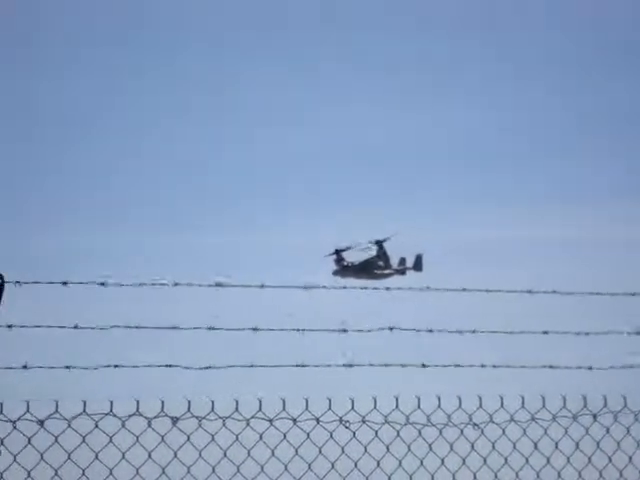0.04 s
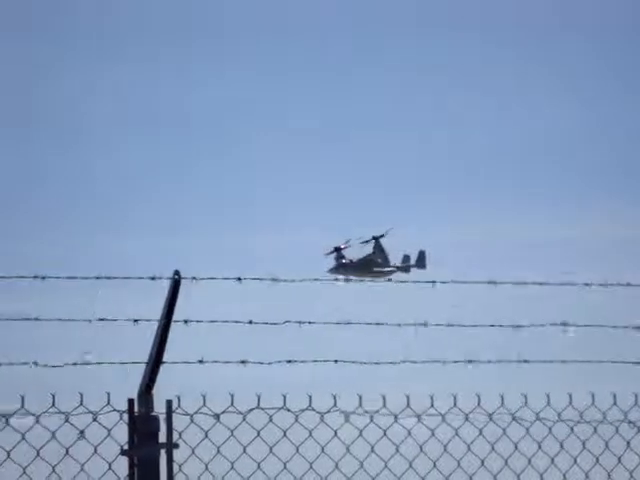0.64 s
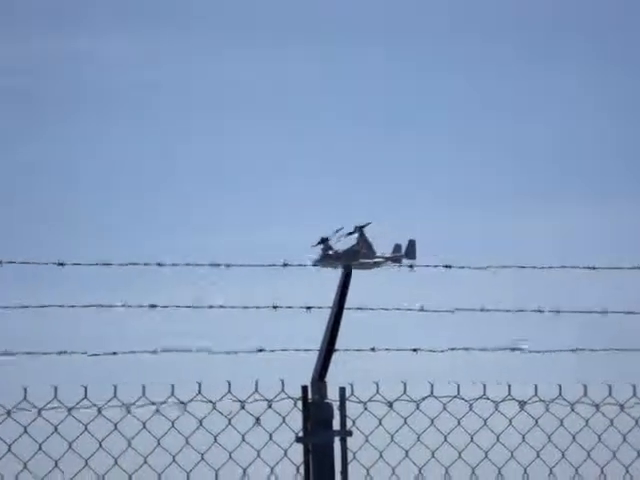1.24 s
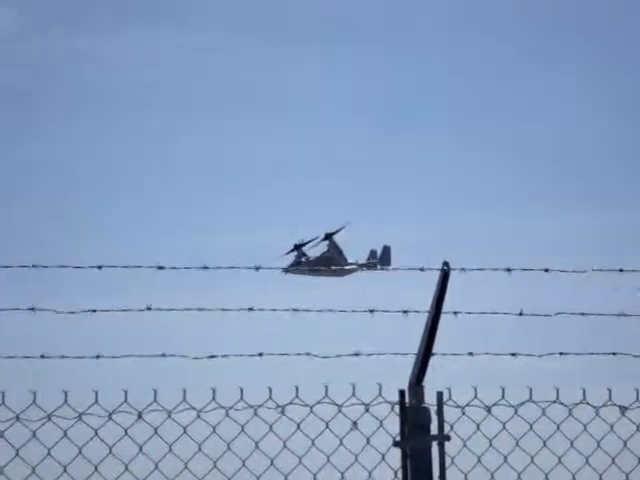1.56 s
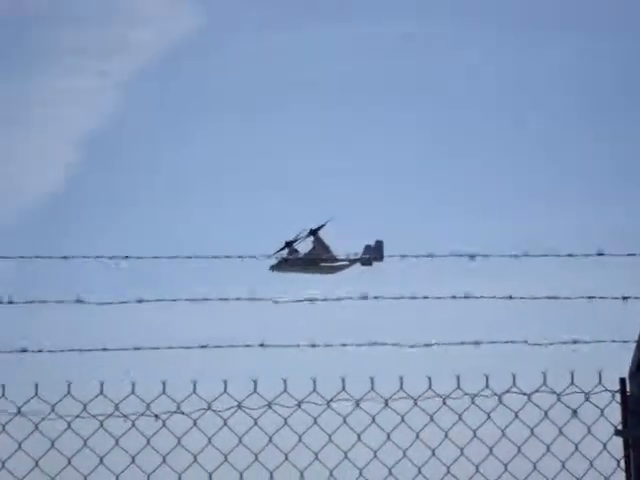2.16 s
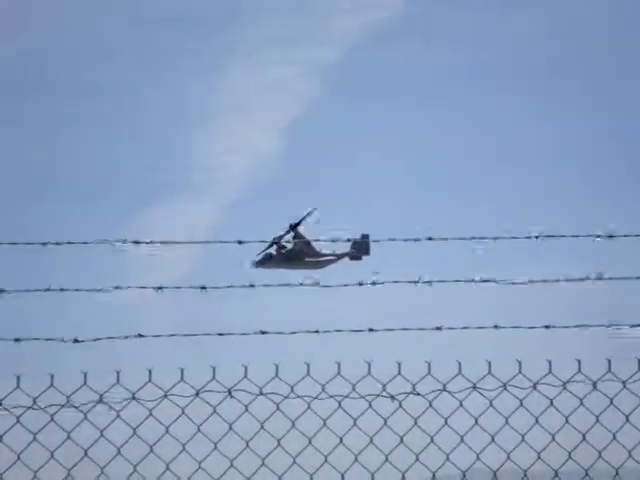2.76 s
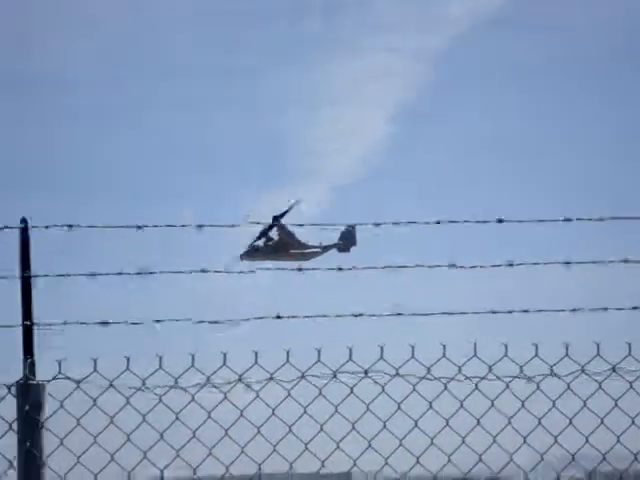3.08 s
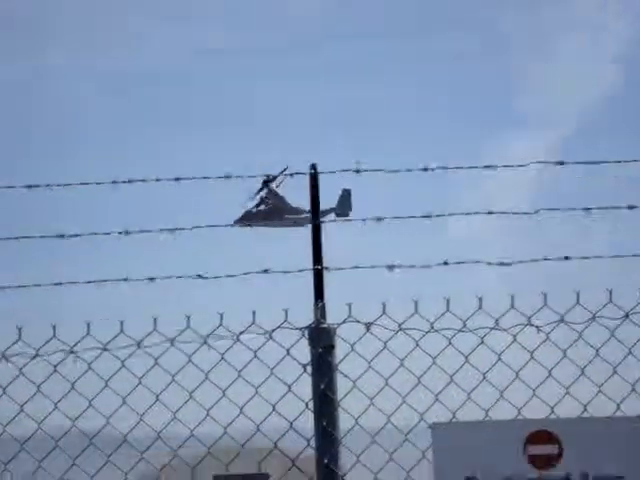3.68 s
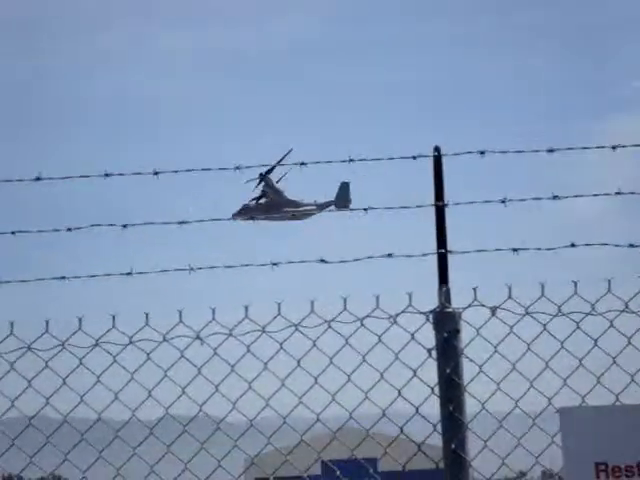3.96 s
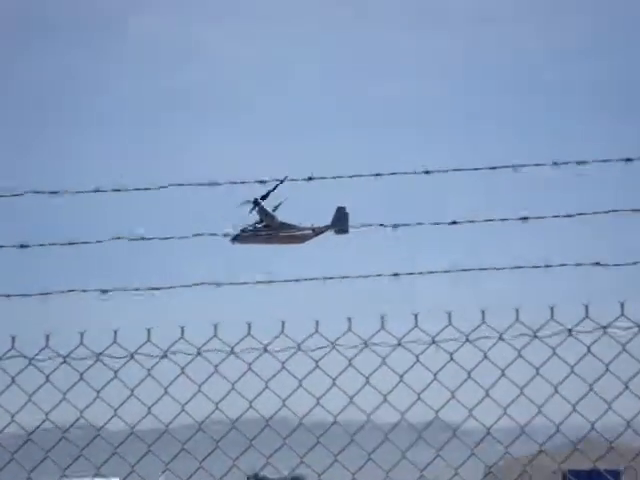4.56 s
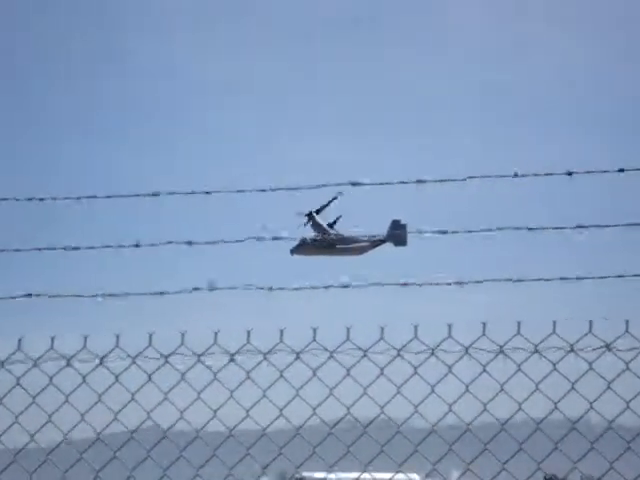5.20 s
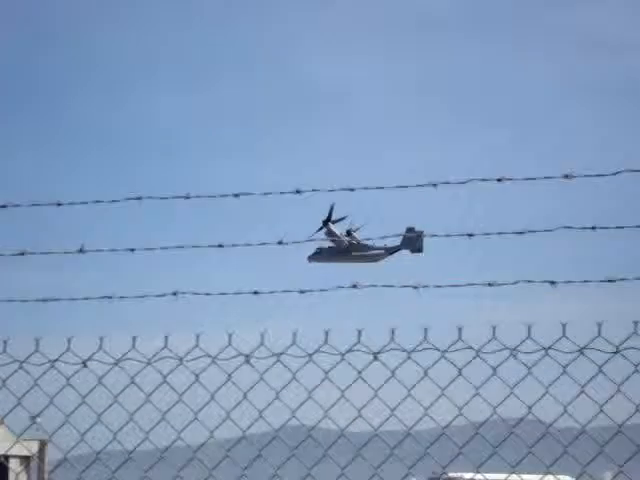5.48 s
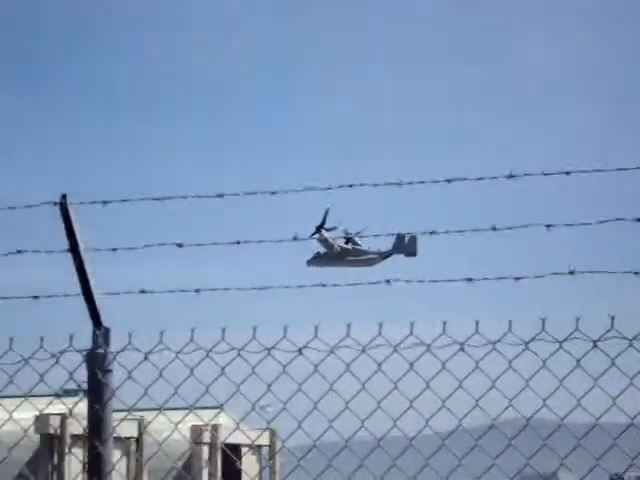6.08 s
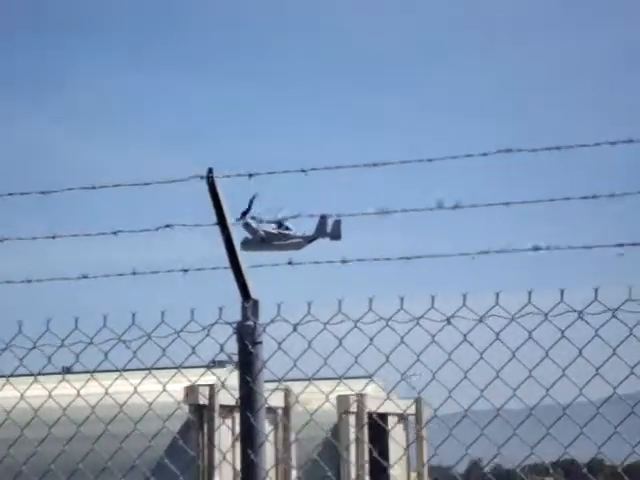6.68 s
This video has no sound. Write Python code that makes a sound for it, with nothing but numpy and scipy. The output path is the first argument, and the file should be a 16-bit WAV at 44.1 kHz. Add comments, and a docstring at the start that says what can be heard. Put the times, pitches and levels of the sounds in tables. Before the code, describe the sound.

A loud, continuous roar of rotors and hissing exhaust comes from a low tiltrotor passing outdoors, picked up by a small microphone at an airfield. Fast, even blade thuds mark the approach, with a thin turbine whine poking through now and then. Just past halfway the thudding drops away, a few sharp cracks and a tiny faint squeak sound, and the rushing noise swells unevenly as the aircraft leaves.

```python
"""A tiltrotor flies low past an airfield fence, heard through a small camera microphone.
On the approach each blade sends a pressure thump, from the near rotor and, later and weaker, the far one,
over a roar of blade turbulence and exhaust hiss; a turbine whine flares through four times.
Near 4 s the aircraft draws level and the thumps fade. A few sharp blade slaps and one faint chirp follow,
and the roar keeps surging as it draws away."""
import sys
import numpy as np
from scipy import signal
from scipy.fft import rfft, irfft
from scipy.io import wavfile
from scipy.ndimage import uniform_filter1d, map_coordinates

SR = 44100
rng = np.random.default_rng(int(sys.argv[2]) if len(sys.argv) > 2 else 0)


def materialize(psi):
    """Save the field psi as 16-bit PCM at rate SR to the path in sys.argv[1].

    A 1-D psi becomes a single channel; in a 2-D psi each row is a channel.
    """
    bounded = np.clip(np.atleast_2d(psi).T, -1, 1)
    quanta = np.round(bounded * 32767).astype(np.int16)
    wavfile.write(sys.argv[1], SR, quanta)


N = 301644
TIME = np.arange(N) / SR


# Thump fader, strong ahead of the rotors and weak behind them: time_s, level_db
THUMP_FADER = [(0, -27.5), (.3, -26), (.48, -23), (.71, -27.5), (1.07, -26), (1.21, -29), (1.62, -27),
               (2.2, -32.5), (2.6, -28.5), (2.94, -33), (3.46, -30.5), (3.7, -31), (3.92, -44), (4.3, -39),
               (5.4, -42), (5.7, -48), (6.84, -51.5)]
# The changing view of the two rotors: time_s, thump_half_width_ms, far_lag_ms, far_level_db
ROTOR_VIEW = [(0, 1.6, 22, -3), (.55, 1.35, 23.8, -7), (1.1, 1.56, 30, -6), (1.55, 1.7, 33.2, -5),
              (2.2, 2, 36, -1), (2.65, 1.6, 41.6, -10), (3.4, 2.12, 48, -30), (4.9, 1.94, 42, -18),
              (6.84, 4.2, 43, -2)]

def thumps(blades, trim_db=-1.0, uneven_db=-1.0, jitter_ms=0.14, mic_low_cut_hz=92):
    """Both rotors turn in step, but the far one's pressure pulses have a longer way to go."""
    half_width_ms, far_lag_ms, far_db = automation(ROTOR_VIEW)
    period_ms = 1000 / automation(BLADE_TEMPO)[0]
    pulses = 0
    for lag_ms, rotor_db in ((0, 0), (far_lag_ms, far_db)):
        from_blade_ms = ((blades - lag_ms / period_ms + .5) % 1 - .5) * period_ms
        u = (from_blade_ms + jitter_ms * drift(15)) / half_width_ms
        pulse = (u ** 2 - 1) * np.exp(-u ** 2 / 2)  # a pressure dip between two crests
        pulses = pulses + pulse * from_db(rotor_db + uneven_db * drift(10))
    # the microphone's bass roll-off makes each dip rebound into a taller crest
    pulses = low_cut(pulses, mic_low_cut_hz)
    return even_level(pulses, window_s=.094) * from_db(automation(THUMP_FADER)[0] + trim_db)


# The rotor's beat, slowing with the Doppler shift: time_s, blade_rate_hz
BLADE_TEMPO = [(0, 22.18), (1, 21.85), (2, 21.47), (3, 21.035), (4, 20.55), (5, 20.01), (6, 19.42),
               (7, 18.78)]

def blade_count(first_thump_s=.0251):
    """Number of blades gone by; whole at each thump of the near rotor."""
    count = np.cumsum(automation(BLADE_TEMPO)[0]) / SR
    return count - np.interp(first_thump_s, TIME, count)


# Sharp accents just after the aircraft draws level: time_s, peak_db, half_width_ms
SLAP_HITS = [(4.8316, -3.5, 0.23), (4.877, -8.5, 0.26), (5.459, -12, 0.31), (5.484, -24, 0.72)]

def slaps():
    """A blade that cuts a tip vortex gives a sharp swing from suction to overpressure."""
    out = 0
    for time_s, peak_db, half_width_ms in SLAP_HITS:
        u = (TIME - time_s) * 1000 / half_width_ms
        out = out + from_db(peak_db) * u * np.exp((1 - u ** 2) / 2)
    return out


# Faders of the noise bed, before surges and trims: time_s, wake_db, roar_db, hiss_db, sizzle_db
BED_FADERS = [(0, -39.5, -23.5, -26.5, -42), (1.1, -38, -25, -28, -42), (2.3, -38.5, -25.5, -27.5, -39.5),
              (3.1, -35, -23, -27, -37), (3.7, -36, -23.5, -25.5, -36.5), (4.4, -35.5, -24.5, -27, -39.5),
              (5.15, -36, -22, -25, -37.5), (5.9, -40, -23, -29, -41.5), (6.84, -36, -26, -29.5, -43)]

def turbulence(blades):
    """Four layers of rushing air that surge together; all but the wake also share a fast flutter."""
    flutter = drift(48)
    wake_db, roar_db, hiss_db, sizzle_db = automation(BED_FADERS)
    low_surge_db, high_surge_db = surges()
    return (wake(blades, wake_db + .23 * low_surge_db)
            + roar(blades, flutter, roar_db + low_surge_db)
            + hiss(blades, flutter, hiss_db + high_surge_db)
            + sizzle(blades, flutter, sizzle_db + .63 * high_surge_db))


# Swells in the noise bed: peak_s, length_s, roar_rise_db, hiss_rise_db
SURGE_CUES = [(.02, 0.068, 2, .5), (0.643, 0.092, 2, 2.5), (1.365, 0.13, 5, 1.8), (1.667, 0.2, 4, 4),
              (1.793, 0.068, 5, 4), (1.953, 0.11, 6, 2.5), (2.127, 0.13, 5.5, 3), (2.536, .14, 3.2, 4),
              (2.875, 0.11, 2.5, 4.5), (3.044, .07, 3, 4), (3.17, 0.055, 2.5, 1.5), (3.74, 0.15, 3, 2.5),
              (3.887, 0.12, 4.7, 5.8), (4.024, 0.041, 3.5, 0), (4.235, 0.031, 6.5, 2.2),
              (4.391, 0.065, 6, 2), (4.523, 0.054, 1.5, 3), (4.73, 0.11, 2.5, 1.5), (4.83, 0.12, 2.5, 2),
              (5.04, 0.056, 3, 1), (5.212, 0.11, 4, 2.5), (5.494, 0.11, 6.5, 4.5), (5.586, 0.066, 1, 3.5),
              (5.762, 0.072, 6, 6.5), (5.904, .05, 3.5, 2), (6.033, 0.093, 7, 10), (6.3, 0.17, 3.5, 6),
              (6.46, 0.069, 7, 6.5), (6.662, 0.079, 7, 6), (6.797, 0.1, 9.5, 6.5)]

def surges(unrest_db=0.33):
    """Restless air lifts the roar and the hiss, in dB: strong surges over small chance ones."""
    roar_db = hiss_db = unrest_db * drift(7)
    for peak_s, length_s, roar_rise_db, hiss_rise_db in SURGE_CUES:
        bell = swell(peak_s, length_s)
        roar_db = roar_db + roar_rise_db * bell
        hiss_db = hiss_db + hiss_rise_db * bell
    return roar_db, hiss_db


# Midrange body of the roar, approaching and side-on: frequency_hz, gain_db
ROAR_EQ_AHEAD = [(300, -43), (450, -17), (560, -6.5), (660, -2.5), (780, -1), (900, 1.5), (1020, -2),
                 (1160, -1.5), (1350, -14.5), (1550, -36), (2200, -62)]
ROAR_EQ_SIDE = [(300, -30.5), (450, -15), (560, -4.5), (660, -3), (780, 0.5), (920, 3), (1020, -0.5),
                (1160, -4), (1350, -16), (1550, -46), (2200, -63)]

def roar(blades, flutter, fader_db, trim_db=0.07, flutter_db=0.2, own_flutter_db=0.87):
    """The blades churn the air into a hollow roar."""
    gain = from_db(fader_db + trim_db + flutter_db * flutter + own_flutter_db * drift(25))
    air = flyby_noise(ROAR_EQ_AHEAD, ROAR_EQ_SIDE)
    return air * gain * swish(blades, depth_db=.13, lag_blades=.04)


# Bright edge of the hiss, approaching and side-on: frequency_hz, gain_db
HISS_EQ_AHEAD = [(800, -38.5), (1250, -2), (1450, 0.5), (1700, 3), (2000, 1.5), (2350, 1), (2850, 1),
                 (3200, -1), (3900, -4.5), (4400, -10), (5500, -33)]
HISS_EQ_SIDE = [(800, -37), (1250, -2), (1420, 2), (1600, 6.5), (1900, 0.5), (2150, 0), (2600, 3),
                (3200, -0.5), (3900, -4), (4400, -11), (5500, -31.5)]

def hiss(blades, flutter, fader_db, trim_db=0.05, flutter_db=1.23):
    """Fine turbulence from the exhausts and blade tips."""
    gain = from_db(fader_db + trim_db + flutter_db * flutter)
    air = flyby_noise(HISS_EQ_AHEAD, HISS_EQ_SIDE)
    return air * gain * swish(blades, depth_db=.15, lag_blades=.043)


# Low-end weight of the wake, approaching and side-on: frequency_hz, gain_db
WAKE_EQ_AHEAD = [(25, -24.5), (50, -10.5), (90, -12.5), (140, -2.5), (210, 4.5), (300, 0.5), (400, -2),
                 (500, -3), (650, -13.5), (1000, -49)]
WAKE_EQ_SIDE = [(25, -29), (50, -14), (90, -16), (140, -4.5), (210, 0), (300, -1.5), (400, -1), (500, -1.5),
                (650, -5.5), (1000, -44)]

def wake(blades, fader_db, trim_db=4.0, flutter_db=1.2):
    """Large eddies shed by the rotors rumble under everything, thinner once the aircraft is past."""
    gain = from_db(fader_db + trim_db + flutter_db * drift(20))
    air = flyby_noise(WAKE_EQ_AHEAD, WAKE_EQ_SIDE, start_s=4.5, end_s=6.53)
    return air * gain * swish(blades, depth_db=1.3, lag_blades=.03)


# Airy top above the hiss: frequency_hz, gain_db
SIZZLE_EQ = [(3000, -25), (3900, -2.5), (4400, 3), (5200, -1.5), (6000, -6), (6800, -11.5), (7600, -17.5),
             (8400, -26), (9200, -30), (10000, -31)]

def sizzle(blades, flutter, fader_db, trim_db=0.86, flutter_db=0.5, own_flutter_db=1.85):
    """The top of the hiss comes and goes with the air on the way."""
    gain = from_db(fader_db + trim_db + flutter_db * flutter + own_flutter_db * drift(70))
    return shaped_noise(SIZZLE_EQ) * gain * swish(blades, depth_db=.75, lag_blades=.05)


# The turbine tone pokes through the bed: peak_s, length_s, rise_db
WHINE_CUES = [(1.67, 0.2, 20), (1.97, 0.25, 22), (2.862, 0.16, 20), (3.15, 0.38, 19)]

def turbine_whine(start_hz=2890, resting_db=-55.5, smear_hz=50):
    """A turbine tone sinks with the blades' Doppler shift, smeared into a narrow band by turbulent air."""
    blade_hz, = automation(BLADE_TEMPO)
    phase = 2 * np.pi * np.cumsum(start_hz * blade_hz / blade_hz[0]) / SR
    band = drift(smear_hz) * np.cos(phase) + drift(smear_hz) * np.sin(phase)
    flare_db = sum(rise_db * swell(peak_s, length_s) for peak_s, length_s, rise_db in WHINE_CUES)
    return from_db(resting_db + flare_db) * unit_rms(band)


def chirp(peak_s=5.198, length_s=.02, peak_db=-35, centre_hz=6240, rise_hz_per_s=22000):
    """A brief rising squeak, perhaps a small bird by the fence."""
    pitch_hz = centre_hz + rise_hz_per_s * np.clip(TIME - peak_s, -length_s, length_s)
    return from_db(peak_db) * swell(peak_s, length_s) * np.sin(2 * np.pi * np.cumsum(pitch_hz) / SR)


def flyby_noise(ahead_eq, side_eq, start_s=3.36, end_s=4.73, rise_from_s=5.5, rise_per_s=.045):
    """Noise that crossfades as the aircraft comes side-on; its peaks creep up as it draws away."""
    crossfade = np.clip((TIME - start_s) / (end_s - start_s), 0, 1)
    speed = 1 + rise_per_s * np.maximum(TIME - rise_from_s, 0)
    side_on = map_coordinates(shaped_noise(side_eq), [np.cumsum(speed)], order=3, mode="wrap")
    return np.sqrt(1 - crossfade) * shaped_noise(ahead_eq) + np.sqrt(crossfade) * side_on


def shaped_noise(eq):
    """Noise through an EQ curve, held at an even level of 1."""
    hz, db = np.transpose(eq)
    bins_hz = np.arange(N // 2 + 1) * SR / N
    gain = from_db(np.interp(np.log(bins_hz + 1), np.log(hz), db, left=-120, right=-120))
    return even_level(irfft(rfft(rng.standard_normal(N)) * gain, N), window_s=.05)


def swish(blades, depth_db, lag_blades):
    """Tremolo gain that swells once a blade."""
    return from_db(depth_db * np.cos(2 * np.pi * (blades - lag_blades)))


def swell(peak_s, length_s):
    """A symmetric bell of height 1; length at half height."""
    return .5 ** ((2 * (TIME - peak_s) / length_s) ** 2)


def drift(rate_hz):
    """Random modulation up to about this rate, at unit rms."""
    bins_hz = np.arange(N // 2 + 1) * SR / N
    return unit_rms(irfft(rfft(rng.standard_normal(N)) / (1 + (bins_hz / rate_hz) ** 4), N))


def automation(rows):
    """One curve for each column after the time, in straight ramps."""
    time_s, *columns = np.transpose(rows)
    return [np.interp(TIME, time_s, column) for column in columns]


def even_level(x, window_s):
    """Ride the gain so the rms over a short triangular window stays near 1."""
    size = int(window_s * SR)
    power = uniform_filter1d(uniform_filter1d(x ** 2, size), size)
    return x / np.sqrt(np.abs(power) + 1e-12)


def low_cut(x, hz):
    """Second-order high-pass."""
    return signal.sosfilt(signal.butter(2, hz, "high", fs=SR, output="sos"), x)


def unit_rms(x):
    """Scale to an rms of 1."""
    return x / np.sqrt(np.mean(x ** 2) + 1e-20)


def from_db(db):
    """Decibels to gain."""
    return 10 ** (np.asarray(db) / 20)


def scene():
    """Mono mix: noise bed and thumps on one blade beat, plus whine, slaps and chirp."""
    blades = blade_count()
    return (turbulence(blades) + thumps(blades) + turbine_whine() + slaps() + chirp())[None]


def record(dry, low_cut_hz=28, high_cut_hz=10050):
    """The microphone loses the deepest bass and the top is cut steeply."""
    high_cut = signal.ellip(12, .1, 90, high_cut_hz, fs=SR, output="sos")
    return signal.sosfilt(high_cut, low_cut(dry, low_cut_hz))


dry = scene()
out = record(dry)
materialize(out)
```